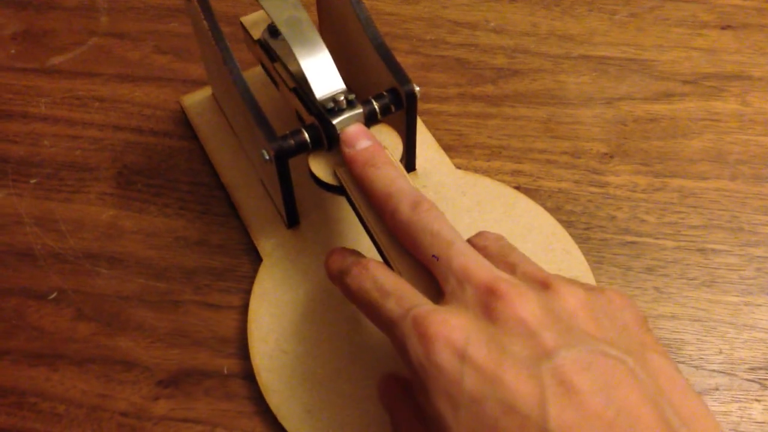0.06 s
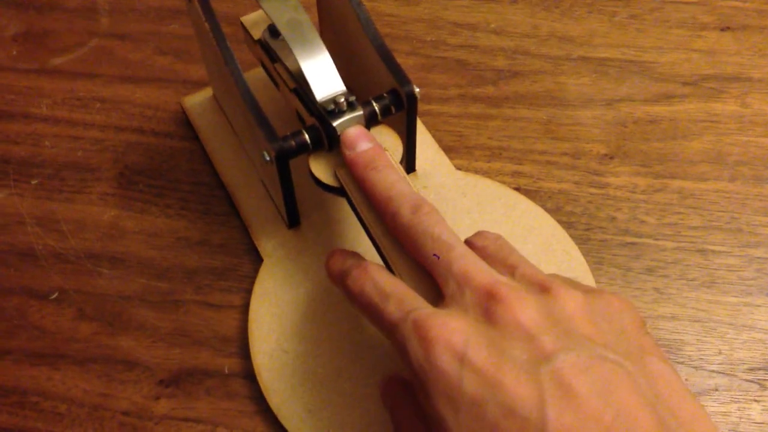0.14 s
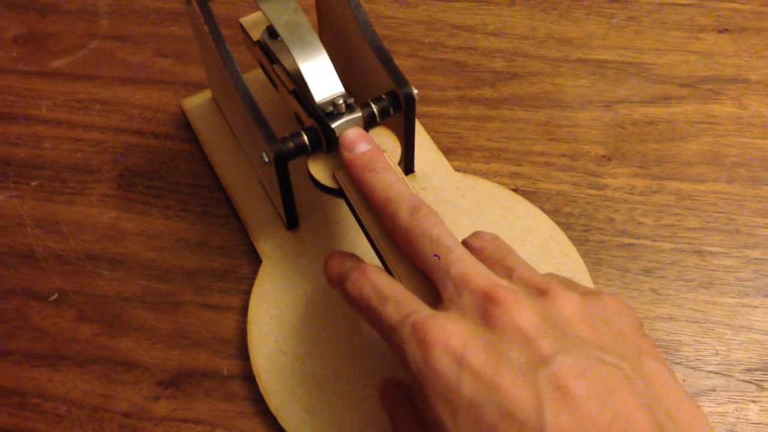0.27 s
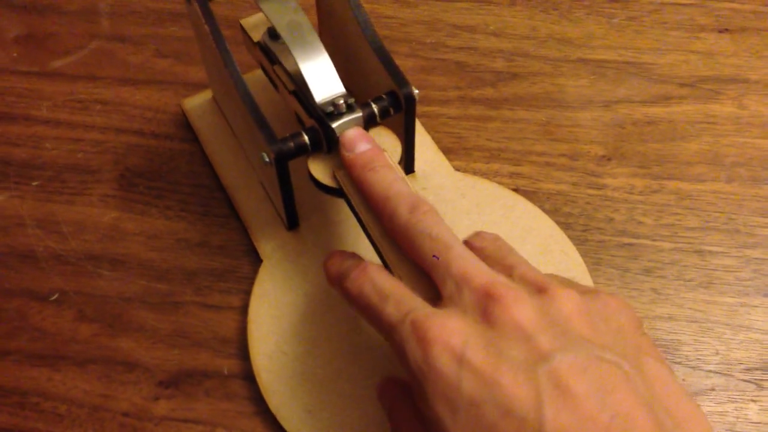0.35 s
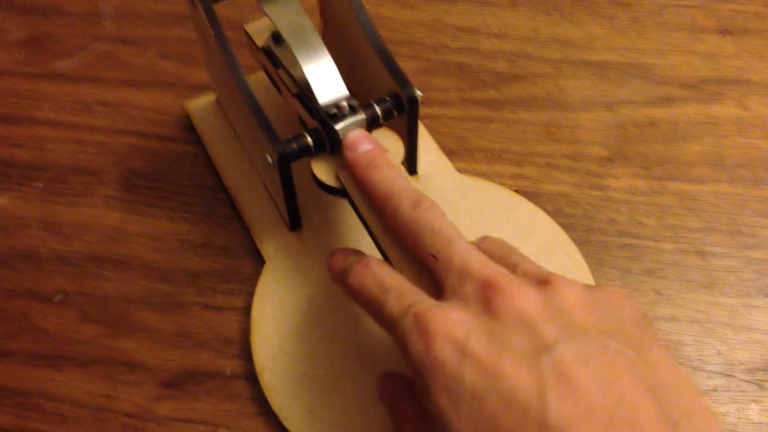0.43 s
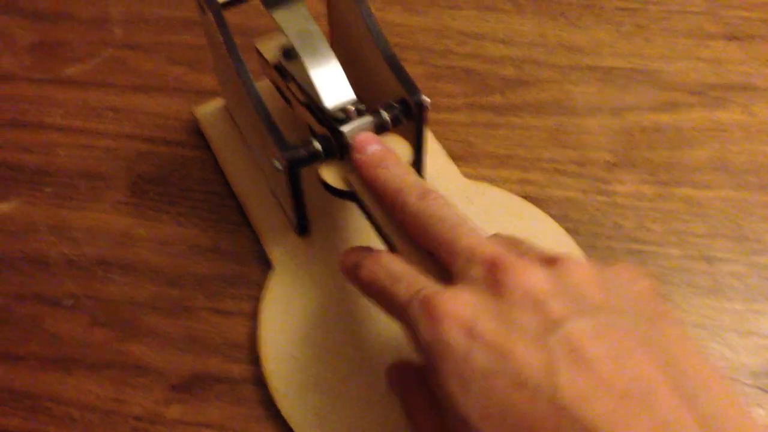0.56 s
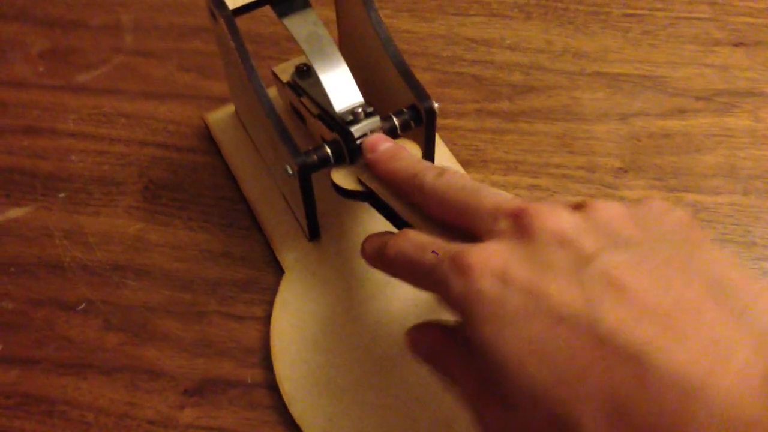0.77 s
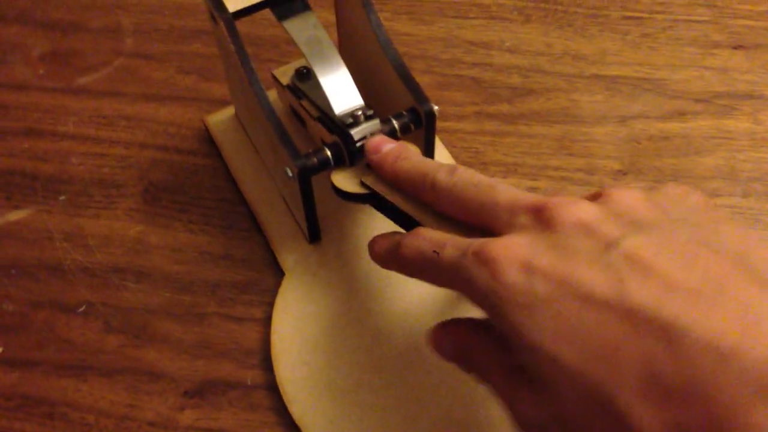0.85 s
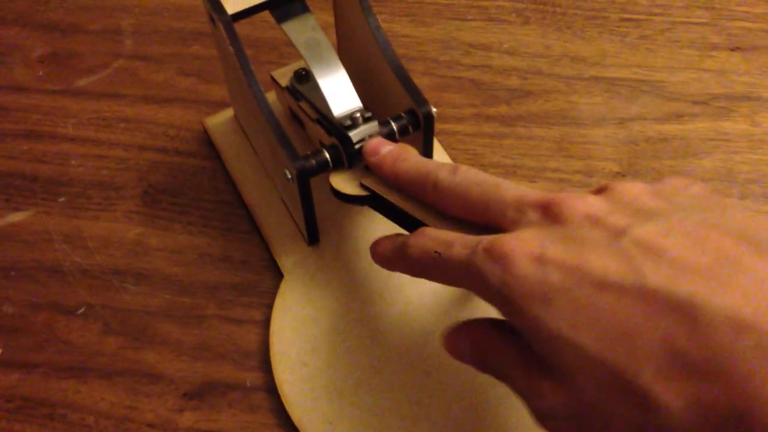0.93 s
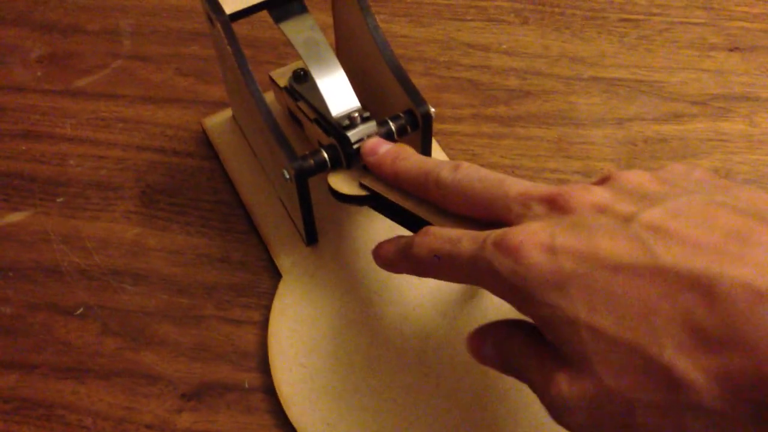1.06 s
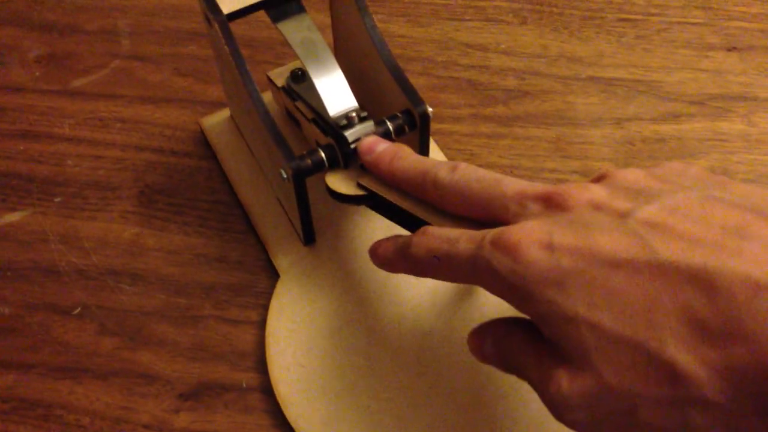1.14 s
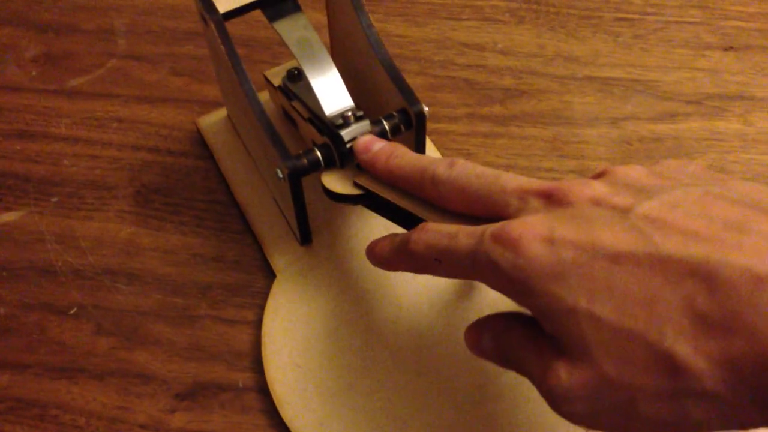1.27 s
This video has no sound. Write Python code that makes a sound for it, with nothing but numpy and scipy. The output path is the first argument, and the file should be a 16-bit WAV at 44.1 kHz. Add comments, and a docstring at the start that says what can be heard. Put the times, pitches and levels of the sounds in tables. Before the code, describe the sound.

One crisp nail clipper snap, with a brief ring over faint hum and hiss.

```python
"""A nail clipper in a wooden lever rig on a table is pressed until it snaps, once.
Two faint ticks and a brief swelling squeak lead into the snap. The steel jaws crack for a few
milliseconds, the lever rings on, the wooden rig knocks and a small room answers.
Behind it are a low hum and soft hiss. Automatic gain control turns everything down after the snap."""
import sys
import numpy as np
from scipy import signal
from scipy.io import wavfile
from scipy.ndimage import uniform_filter1d

SR = 44100
rng = np.random.default_rng(int(sys.argv[2]) if len(sys.argv) > 2 else 0)


def bounce(signal):
    """Save signal as a 16-bit WAV file at the path given by the first command-line argument."""
    frames = np.transpose(np.atleast_2d(signal))
    limited = np.clip(frames, -1, 1)
    pcm = np.round(limited * 32767).astype(np.int16)
    wavfile.write(sys.argv[1], SR, pcm)


N = 57330
TIME = np.arange(N) / SR
SNAP_S = .22725


def from_db(db):
    """Turn decibels into a number to multiply by."""
    return 10 ** (np.asarray(db) / 20)


def rms_one(x):
    """Scale a signal so that its average strength (rms) is 1."""
    return x / np.sqrt(np.mean(x ** 2) + 1e-20)


def at_hz(points, hz):
    """Read between a table's rows, with octaves evenly spaced."""
    row_hz, values = np.transpose(points)
    return np.interp(np.log(hz), np.log(row_hz), values)


def narrow_noise(hz, width_hz):
    """Noise sent twice through a resonance, so it gathers around one pitch."""
    b, a = signal.iirpeak(hz, hz / width_hz, fs=SR)
    once = signal.lfilter(b, a, rng.standard_normal(N + SR))
    return rms_one(signal.lfilter(b, a, once)[SR:])


def drift(rate_hz):
    """A slow random wobble, about 1 in size."""
    low_pass = signal.butter(2, rate_hz, fs=SR, output="sos")
    return rms_one(signal.sosfilt(low_pass, rng.standard_normal(N + SR))[SR:])


def noise_bands(spectrum):
    """Shaped noise in sixth-octave bands: gives their centres in Hz and the bands, whose sum has rms 1."""
    edges = np.geomspace(30, 17000, 56)
    centres = np.sqrt(edges[:-1] * edges[1:])
    low_pass = signal.ellip(10, .2, 80, 15300, fs=SR, output="sos")
    white = signal.sosfilt(low_pass, rng.standard_normal((2, N + SR // 4)))
    bands = np.zeros((len(centres), N))
    for k, hz in enumerate(centres):
        band_pass = signal.butter(2, edges[k:k + 2], "band", fs=SR, output="sos")
        bands[k] = from_db(at_hz(spectrum, hz)) * signal.sosfilt(band_pass, white[k % 2])[-N:]
    return centres, bands / bands.sum(0).std()


# The tone colour of the hiss. Each row: frequency in Hz, relative level in dB.
HISS_SPECTRUM = [(30, -22.5), (70, -20), (100, -13), (140, -0.5), (210, 3), (320, -6.5), (440, -4.5),
                 (650, -9.5), (1300, -16.5), (3000, -17.5), (8000, -18.5), (15000, -20)]

def hiss(level_db=-64.5, flicker_db=1.33):
    """Soft hiss in which each band flickers on its own."""
    _, bands = noise_bands(HISS_SPECTRUM)
    return from_db(level_db) * sum(band * from_db(flicker_db * drift(rate_hz=24)) for band in bands)


# How the hum swells and fades. Each row: time in seconds, level in dB.
HUM_SWELLS = [(0, -63), (.04, -69), (.1, -72.5), (.15, -59.5), (.2, -62.5), (.33, -72.5), (.5, -68),
              (.62, -72.5), (.71, -64.5), (.77, -72.5), (.89, -62.5), (.95, -71.5), (1.05, -73.5),
              (1.16, -63), (1.21, -78), (1.3, -78)]

def hum(pitch_hz=211, wander_hz=19, flicker_db=2.5, whine_db=-79.5):
    """A low hum that wavers in pitch and level, with a faint whine above it."""
    phase = 2 * np.pi * np.cumsum(pitch_hz + wander_hz * drift(rate_hz=22)) / SR
    level_db = np.interp(TIME, *np.transpose(HUM_SWELLS)) + flicker_db * drift(rate_hz=8.3)
    whine = from_db(whine_db) * narrow_noise(441, width_hz=25)
    return from_db(level_db) * np.sqrt(2) * np.sin(phase) + whine


# The tone colour of the room's echo. Each row: frequency in Hz, relative level in dB.
ECHO_SPECTRUM = [(140, -11), (260, 3.5), (450, -20.5), (730, -7), (950, -11.5), (2000, -5), (2550, -7),
                 (3050, 7.5), (3600, -10), (4200, -5), (4900, -11.5), (5800, -2), (8000, -1.5),
                 (10500, -2.5), (14000, -1), (15500, -31.5)]
# How long the echo lasts. Each row: frequency in Hz, seconds to fade by 60 dB.
ECHO_FADES = [(200, 0.19), (1000, .22), (3000, 0.3), (6000, .25), (14000, 0.18)]

def room_echo(gain_db=-25.5, build_s=0.0077):
    """The room answers the snap with a wash of noise that builds quickly and dies band by band."""
    age = np.maximum(TIME - SNAP_S, 0)
    centres, bands = noise_bands(ECHO_SPECTRUM)
    tail = sum(band * from_db(-60 * age / at_hz(ECHO_FADES, hz)) for hz, band in zip(centres, bands))
    return from_db(gain_db) * (1 - np.exp(-age / build_s)) * tail


def squeak(pitch_hz=2470, peak_db=-27.5, rise_s=0.021, roughness=0.49):
    """A slightly rough tone swells as the jaws bite and ends with the snap."""
    left_s = SNAP_S - TIME
    swell = from_db(peak_db - 60 * np.abs(left_s) / rise_s) * (left_s > 0)
    tone = np.sin(2 * np.pi * pitch_hz * left_s)
    return swell * (tone + roughness * narrow_noise(pitch_hz, width_hz=1200))


def struck(tones, start_s, rise_cycles=0):
    """One blow sets off fading tones; a heavy body takes a few cycles to get moving."""
    age = np.maximum(TIME - start_s, 0)
    ring = np.zeros(N)
    for hz, db, fade_s in tones:
        rise = np.minimum(age / (rise_cycles / hz + 1 / SR), 1)
        ring += from_db(db - 60 * age / fade_s) * np.cos(2 * np.pi * hz * age) * rise
    return ring


# The tones of the rig and table. Each row: pitch in Hz, level in dB, seconds to fade by 60 dB.
WOOD_TONES = [(223.7, -27.5, 0.1), (261, -29.5, 0.06), (727, -31.5, .125), (1180, -30.5, 0.064),
              (1431, -31.5, .045), (1655, -32, .028)]

def wood_knock():
    """The snap knocks the wooden rig and the table under it."""
    return struck(WOOD_TONES, SNAP_S, rise_cycles=2.7)


# The tones of the lever. Each row: pitch in Hz, level in dB, seconds to fade by 60 dB.
LEVER_TONES = [(2030, -48.5, 0.28), (2696, -49, .27), (2890, -49.5, .28), (3077, -47, 0.18),
               (3136, -44, .25), (3040, -46.5, 0.098), (5825, -49, .28)]

def lever_ring():
    """The sprung lever rings on faintly after the snap."""
    return struck(LEVER_TONES, SNAP_S)


# Bounces along the jaws. Each entry: a delay in seconds.
BOUNCE_DELAYS = [.00012, .00021]

def chatter(blow, bounce_share=0.46):
    """The blow bounces along the jaws, which spreads it over about a millisecond."""
    for delay_s in BOUNCE_DELAYS:
        taps = np.r_[bounce_share, np.zeros(int(delay_s * SR)), 1]
        blow = signal.lfilter(taps, taps[::-1], blow + 1e-18)   # all-pass: smears time, keeps colour
    return blow


# The tones of the steel clipper. Each row: pitch in Hz, level in dB, seconds to fade by 60 dB.
STEEL_TONES = [(2350, -24, .016), (2780, -25, 0.035), (3150, -14, 0.014), (4330, -8, 0.0045),
               (5400, -9, 0.003), (6410, -12.5, .005), (7710, -18, .007), (8960, -24, .007),
               (10400, -6.5, .005), (11910, -7.5, .004), (12200, -22, 0.012), (14080, -17, .005)]
# Ticks before the snap. Each row: start in seconds, level in dB compared with the snap.
LOAD_TICKS = [(0.2038, -41.5), (0.2151, -47.5)]

def clipper_jaws():
    """The steel jaws tick twice as they take the load, then snap. Small parts give off little bass."""
    ticks = sum(from_db(db) * struck(STEEL_TONES, start_s) for start_s, db in LOAD_TICKS)
    snap = struck(STEEL_TONES, SNAP_S)
    low_cut = signal.butter(2, 810, "high", fs=SR, output="sos")
    return chatter(signal.sosfilt(low_cut, ticks + snap))


def scene():
    """Everything reaches one close microphone that is thin in the bass."""
    clipper = clipper_jaws() + lever_ring() + wood_knock() + squeak()
    low_cut = signal.butter(2, 130, "high", fs=SR, output="sos")
    return signal.sosfilt(low_cut, clipper + room_echo() + hiss() + hum())[None]


def record(dry):
    """Gain control dips after a loud sound and recovers slowly; peaks are rounded, top treble is cut."""
    threshold_db, cut_share, ceiling = -39, 0.29, 0.93
    attack_s, recovery_db_per_s = .02, 4
    level_db = 10 * np.log10(np.maximum(uniform_filter1d(dry[0] ** 2, size=64), 1e-12))
    cut_db = cut_share * np.maximum(level_db - threshold_db, 0)
    recovery_db = recovery_db_per_s * TIME
    held_db = np.maximum.accumulate(cut_db + recovery_db) - recovery_db
    smoothing = np.exp(-1 / (attack_s * SR))
    turned_down = dry * from_db(-signal.lfilter([1 - smoothing], [1, -smoothing], held_db))
    low_pass = signal.ellip(10, .2, 80, 15400, fs=SR, output="sos")
    return signal.sosfilt(low_pass, ceiling * np.tanh(turned_down / ceiling))


dry = scene()
out = record(dry)
bounce(out)
```